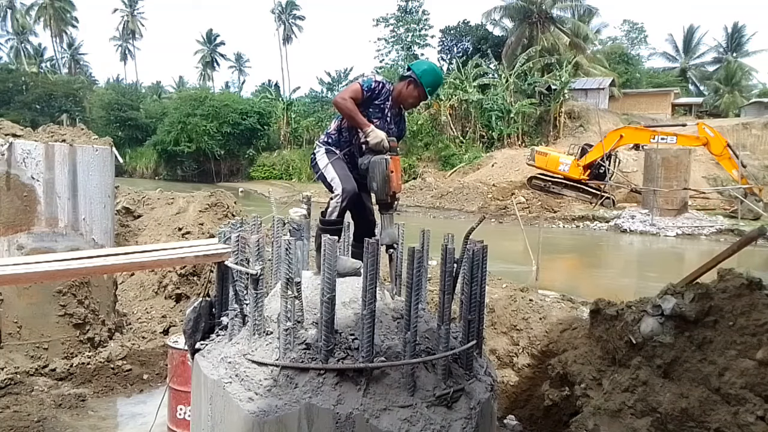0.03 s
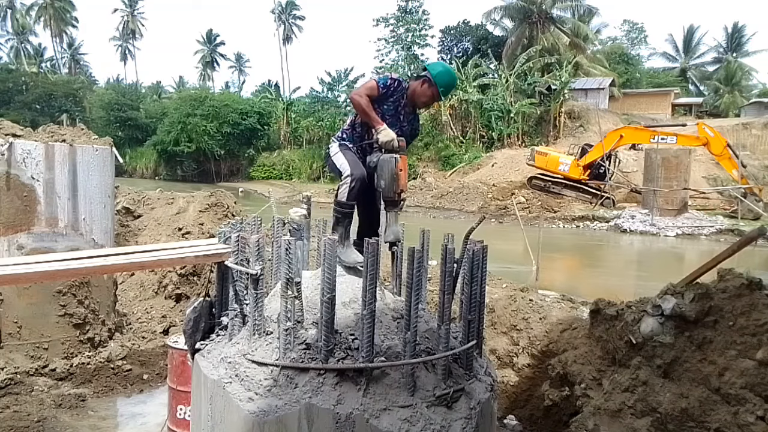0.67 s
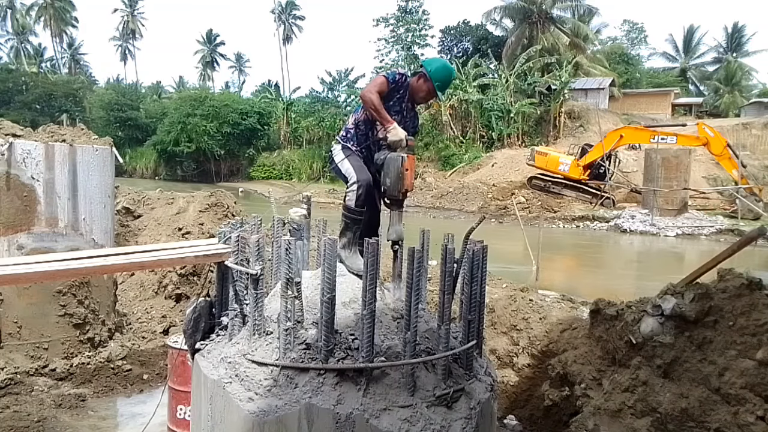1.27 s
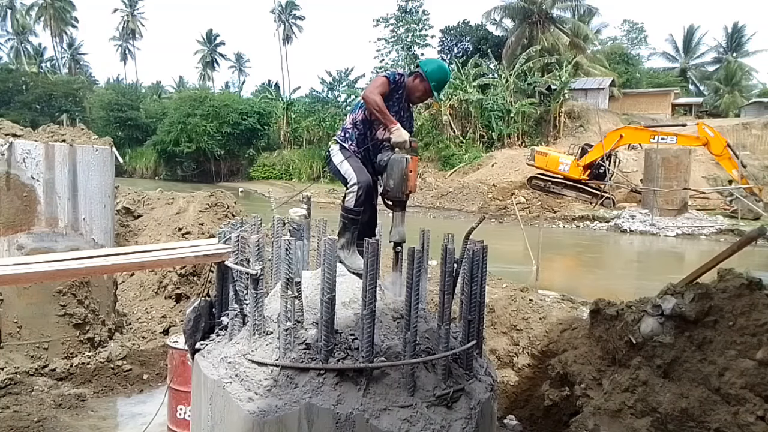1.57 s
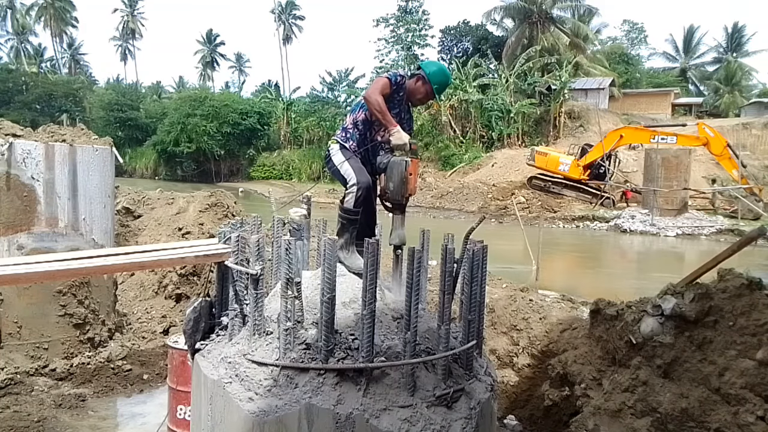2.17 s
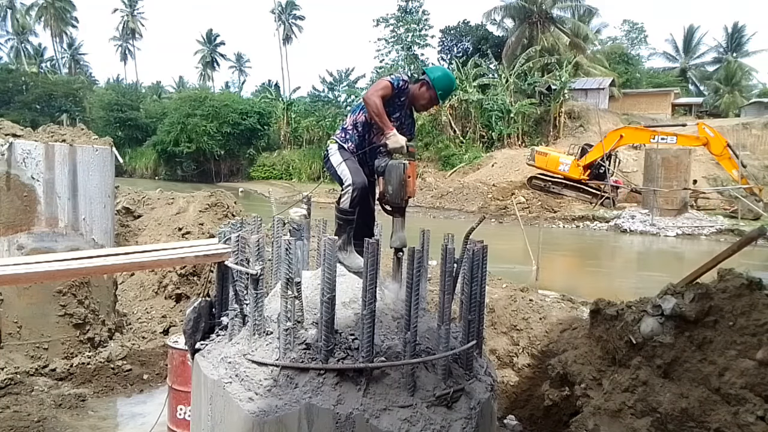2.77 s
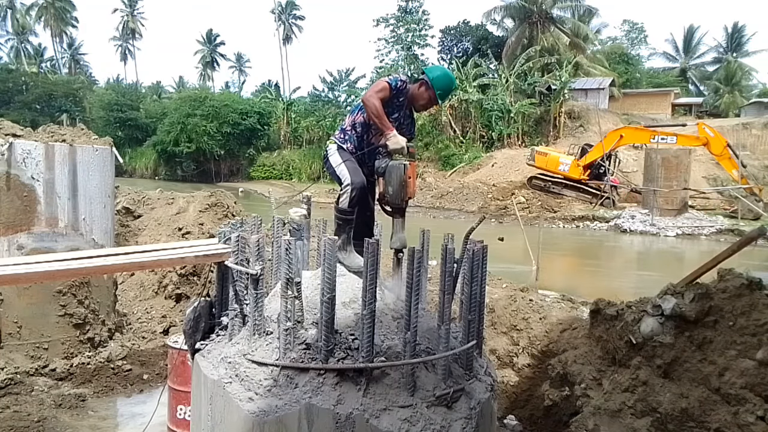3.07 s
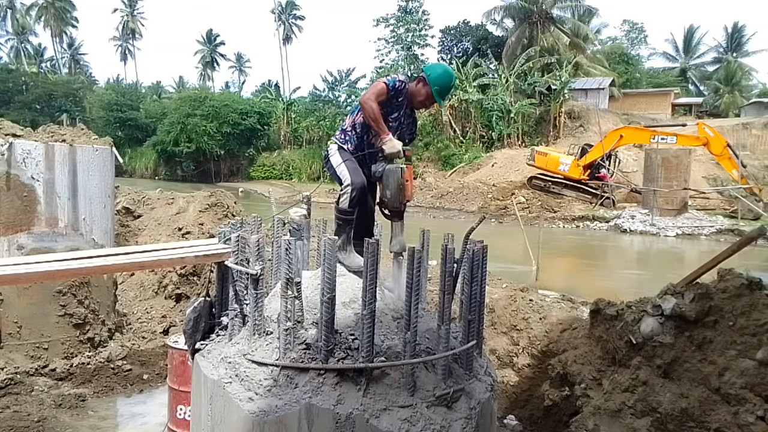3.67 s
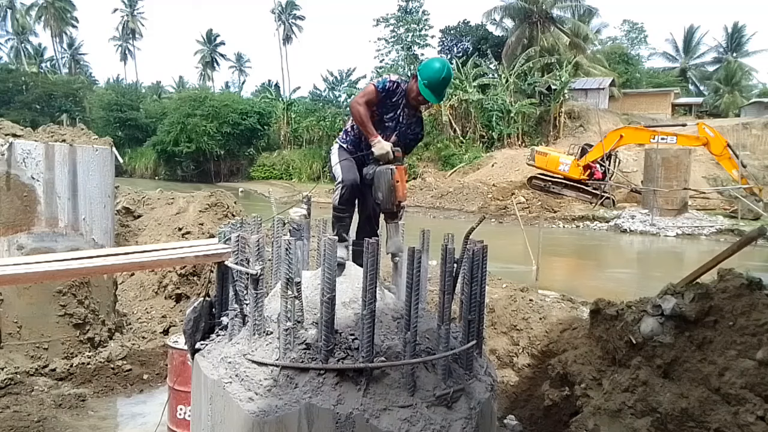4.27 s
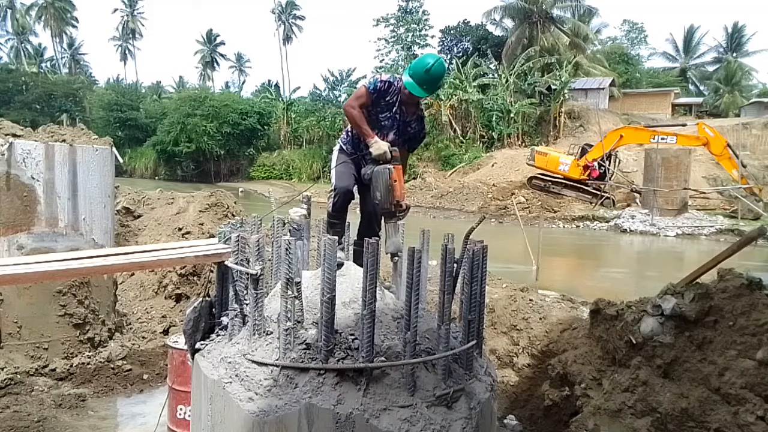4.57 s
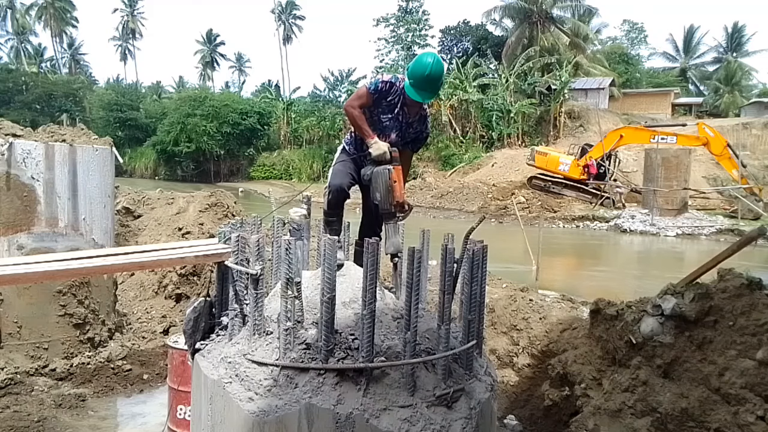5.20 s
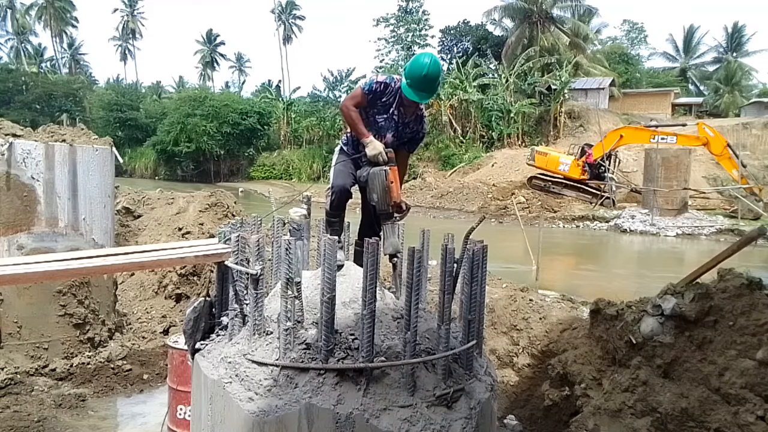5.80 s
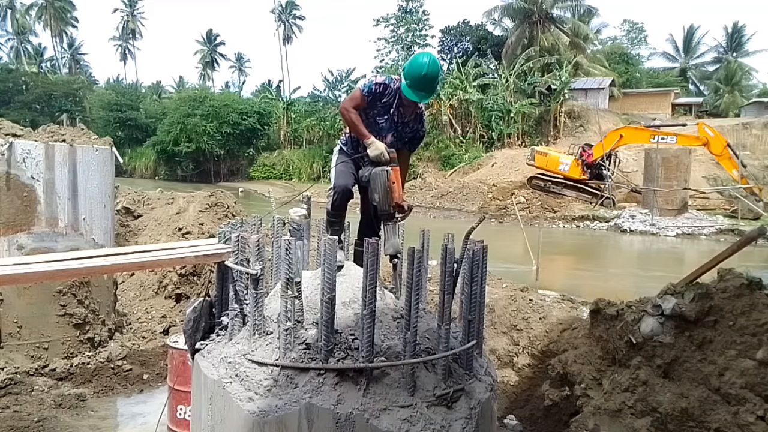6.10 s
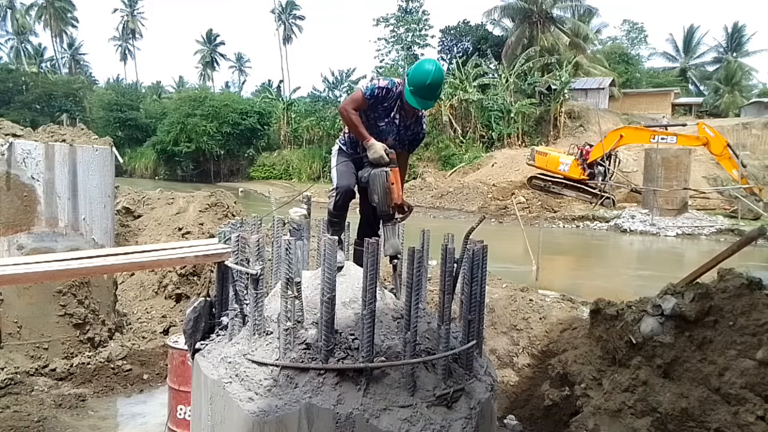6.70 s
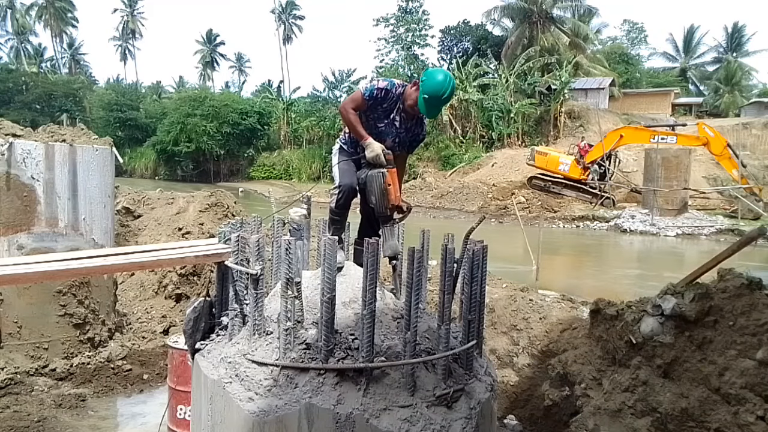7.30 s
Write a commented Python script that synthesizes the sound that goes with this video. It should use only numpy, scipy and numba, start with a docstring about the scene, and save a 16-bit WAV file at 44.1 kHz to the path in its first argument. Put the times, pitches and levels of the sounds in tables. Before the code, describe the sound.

An excavator rumbles, then a loud air hammer starts rattling against concrete, its chisel ringing, and slows near the end.

```python
"""A handheld air hammer breaks the concrete head of a pile on a building site.
First a diesel excavator rumbles nearby, its pump moaning; the chisel clinks down and rubble crunches.
Just after 1 s air rushes in, then up to some twenty blows a second follow: each a puff of exhaust,
a crack, flying grit and the ring of the steel chisel. The blows overload the microphone, and its gain
control pushes the engine far down. Later the chisel binds, its ring muffled; near 7 s the piston slows."""
import sys
import numpy as np
from scipy import signal
from scipy.fft import rfft, irfft
from scipy.io import wavfile
from scipy.ndimage import uniform_filter1d, minimum_filter1d
from numba import njit

SR = 44100
rng = np.random.default_rng(int(sys.argv[2]) if len(sys.argv) > 2 else 0)


def unload_wav(signal):
    """Save mono or channel-first audio to the path in sys.argv[1] as 16-bit WAV at rate SR, clipped to [-1, 1]."""
    wavfile.write(
        sys.argv[1],
        SR,
        np.round(np.clip(np.atleast_2d(signal).T, -1, 1) * 32767).astype(np.int16),
    )


N = 328545
T = np.arange(N) / SR


def undb(db):
    """Decibels to gain."""
    return 10 ** (np.asarray(db) / 20)


def unit(x):
    """Scale to rms 1."""
    return x / np.sqrt(np.mean(x ** 2))


def curve(rows, t, column=1):
    """Automation: one column of a table, joined by straight lines in time."""
    rows = np.array(rows)
    return np.interp(t, rows[:, 0], rows[:, column])


def add(out, start_s, x):
    """Mix x into out from start_s on."""
    i = max(int(start_s * SR), 0)
    out[i:i + len(x)] += x[:max(N - i, 0)]


def drift(rate_hz):
    """Smooth random modulation: sample and hold, slewed twice; rms 1."""
    hold = int(SR / rate_hz)
    steps = np.repeat(rng.standard_normal(N // hold + 1), hold)
    return unit(uniform_filter1d(uniform_filter1d(steps, hold), hold)[:N])


def equalise(x, points, resonances=()):
    """EQ curve plus resonant peaks, at power gain 1; minimum phase keeps the attacks sharp."""
    size = 4096
    f = np.arange(size // 2 + 1) * SR / size
    hz, db = np.transpose(points)
    peaks_db = sum(lift / (1 + (2 * (f - centre) / width) ** 2) for centre, width, lift in resonances)
    shape_db = np.interp(np.log(f + 1), np.log(hz), db) + peaks_db
    cepstrum = irfft(np.log(undb(shape_db)))
    cepstrum[1:size // 2] *= 2
    cepstrum[size // 2 + 1:] = 0
    response = irfft(np.exp(rfft(cepstrum)))
    return signal.fftconvolve(x, response / np.linalg.norm(response))[:N]


def noise_band(hz, width_hz):
    """Noise in one steep-sided resonance, rms 1."""
    f = np.arange(N // 2 + 1) * SR / N
    return unit(irfft(rfft(rng.standard_normal(N)) / (1 + (2 * (f - hz) / width_hz) ** 2), N))


def grit(per_second, spread_db):
    """Random ticks of very unequal size, rms 1."""
    ticks = (rng.random(N) < per_second / SR) * rng.standard_normal(N)
    return unit(ticks * undb(spread_db * np.minimum(rng.exponential(size=N), 4)))


def ring(t, hz, db, scatter_db, detune):
    """Modes struck at a slightly new place each time, so their balance and pitches vary; rms 1."""
    size, phase, shift = rng.standard_normal((3, len(hz)))
    gains = undb(db + scatter_db * size)
    modes = np.sin(2 * np.pi * (np.outer(hz * (1 + detune * shift), t) + phase[:, None]))
    return np.sqrt(2) * gains / np.linalg.norm(gains) @ modes


# drone of the engine and pump, firing tone first: (frequency [Hz], relative level [dB])
ENGINE_TONES = [(67.4, -32.5), (134.8, -33.5), (190.7, -42), (252.6, -33), (269.7, -31.5), (337.1, -44),
                (370.7, -38), (446.4, -42), (555.7, -46), (745.8, -51), (835.5, -52), (1074.4, -50)]
# EQ of the combustion rumble: (frequency [Hz], relative level [dB])
RUMBLE_EQ = [(25, -25), (45, -6), (65, -4.5), (140, 3), (200, -2), (290, 2.5), (340, -8.5), (460, -4),
             (590, -2.5), (700, -13), (860, -7.5), (1030, -23), (1230, -17.5), (1500, -39), (5000, -48),
             (13000, -69)]
# the excavator swells as it works: (time [s], engine gain [dB], hydraulic hiss level [dB])
ENGINE_LOAD = [(0, 1.5, -54), (.25, -2, -66), (.5, -1, -61.5), (.7, 1, -78), (1.2, -0.5, -70),
               (1.6, -7, -70), (7.15, -5.5, -75), (7.45, 0.5, -62)]
def excavator(rumble_db=-24.5, throb=0.2, waver=0.0014, flicker_db=1.5, whine_db=-67):
    """The bed: tones on one wavering shaft, rumble throbbing with the firings, hydraulic hiss and whine."""
    shaft_time = np.cumsum(1 + waver * drift(6)) / SR
    drone = np.zeros(N)
    for hz, db in ENGINE_TONES:
        level = np.sqrt(2) * undb(db + flicker_db * drift(7))
        drone += level * np.sin(2 * np.pi * (hz * shaft_time + rng.random()))
    firing = 1 + throb * np.sin(2 * np.pi * ENGINE_TONES[0][0] * shaft_time)
    rumble = undb(rumble_db) * equalise(firing * rng.standard_normal(N), RUMBLE_EQ)
    hiss = undb(curve(ENGINE_LOAD, T, column=2)) * noise_band(8330, 1200)
    whine = undb(whine_db) * noise_band(8960, 180)
    return (drone + rumble) * undb(curve(ENGINE_LOAD, T)) + hiss + whine


# glide of the pump's moan: (time [s], pitch [Hz], relative level [dB])
PUMP_MOAN = [(0, 1310, -37.5), (.1, 1263, -49), (.17, 1207, -50), (.3, 1215, -61), (.45, 1220, -68),
             (.55, 1200, -57), (.65, 1215, -63), (.75, 1260, -48), (.95, 1210, -61), (1.2, 1223, -53)]
def pump(roughness=1.0):
    """The hydraulic pump takes up load with a rough, gliding tone."""
    phase = 2 * np.pi * np.cumsum(curve(PUMP_MOAN, T)) / SR
    tone = np.sin(phase) + roughness * drift(90) * np.cos(phase)
    return np.sqrt(2) * undb(curve(PUMP_MOAN, T, column=2)) * tone


# crunches underfoot and at the tip: (time [s], level [dB], half-width [s])
CRUNCHES = [(0.418, -57, .004), (.71, -52, .012), (0.752, -46.5, 0.046), (1.04, -45, 0.005),
            (2.9, -22, .012), (4.189, -18.5, 0.025)]
# EQ of the rubble: (frequency [Hz], relative level [dB])
RUBBLE_EQ = [(500, -7), (1800, 8), (3000, -2.5), (6000, -18), (7700, -7), (11000, -29)]
def rubble(crumbs_db=-68):
    """Rubble crunches under the boots and the chisel, and loose crumbs tick."""
    envelope = sum(undb(db) * np.exp(-((T - s) / width) ** 2) for s, db, width in CRUNCHES)
    return equalise(envelope * grit(4000, 3) + undb(crumbs_db) * grit(60, 1.5), RUBBLE_EQ)


# one touch and two bounces: (time [s], level [dB])
SET_DOWN = [(.281, -37.5), (.288, -48), (.295, -56)]
# bright, steely EQ of the clink: (frequency [Hz], relative level [dB])
CLINK_EQ = [(1500, -2), (3500, -6), (4100, 0), (4800, -9), (7000, -12), (9000, 7), (10500, -14),
            (15000, -18)]
def clinks(fall_s=0.0069, ring_s=0.086, ring_db=-16):
    """The chisel is set down, steel on steel: quick ticks with a faint tail."""
    t, envelope = T[:SR // 3], np.zeros(N)
    for s, db in SET_DOWN:
        add(envelope, s, undb(db) * (np.exp(-t / fall_s) + undb(ring_db) * np.exp(-t / ring_s)))
    return equalise(envelope * rng.standard_normal(N), CLINK_EQ)


# the tool touches a reinforcing bar: (time [s], pitch [Hz], level [dB], decay [s])
BAR_TOUCHES = [(.283, 4130, -55, .04), (4.186, 2540, -30, 0.018), (4.19, 3180, -30, .012),
               (4.228, 3070, -27, .016), (4.231, 4100, -22, 0.018), (7.313, 2860, -21, 0.011)]
def bar_chinks():
    """A touched bar rings briefly in a close pair of modes."""
    t, out = T[:SR // 4], np.zeros(N)
    for s, hz, db, fall_s in BAR_TOUCHES:
        pair = ring(t, np.array([hz, hz]), 0, scatter_db=-5, detune=0.014)
        add(out, s, undb(db) * np.exp(-t / fall_s) * pair)
    return out


# tempo of the piston, set by the trigger: (time [s], pace [strokes/s])
PISTON_PACE = [(1.27, 12.38), (1.38, 17.81), (1.65, 20.94), (1.69, 24.99), (1.87, 17.7), (1.92, 28.56),
               (2.08, 18.34), (2.16, 6.07), (2.22, 18.93), (2.47, 10.02), (2.57, 12.31), (2.65, 18.55),
               (2.92, 20.3), (4.09, 20.68), (4.14, 17.91), (4.18, 20.73), (4.73, 20.78), (4.92, 17.84),
               (4.99, 14.24), (5.16, 15.54), (5.32, 20.53), (5.81, 21.66), (6.0, 19.72), (6.05, 16.53),
               (6.25, 12.81), (6.34, 17.7), (6.54, 21.47), (6.74, 14.95), (7.02, 8.7), (7.3, 4.57)]
def pace_octaves(t, full_pace_hz=20.5):
    """The piston's pace in doublings from full pace."""
    return np.log2(curve(PISTON_PACE, t) / full_pace_hz)


# the chisel bites as the worker leans on the tool: (time [s], relative crack level [dB])
BITE = [(1.27, -8), (1.34, -15.5), (1.58, -10.5), (1.68, -15.5), (1.92, -17), (2.0, -14), (2.12, -15),
        (2.55, -13.5), (2.78, -10.5), (3.1, -10), (3.19, -17.5), (3.47, -16), (3.8, -12.5), (4.15, -11),
        (4.3, -14), (4.65, -9.5), (5.05, -13.5), (5.8, -11), (6.12, -13.5), (6.47, -9.5), (6.6, -12.5),
        (6.9, -14.5), (7.29, -27)]
# the exhaust grows as the tool is turned: (time [s], puff gain on top of the bite [dB])
PUFF_GAIN = [(1.3, -12), (1.75, -5.5), (2.0, -5.5), (3.2, -9.5), (4.1, -7), (4.45, -6.5), (4.62, -18),
             (4.85, -1.5), (5.3, -5.5), (5.5, -8.5), (5.92, -4), (6.1, -13), (6.45, -7), (7.3, -15)]
# the chisel rings shorter and purer as it sinks into the concrete:
# (time [s], relative ring level [dB], ring length [s], overtone damping [dB])
CHISEL_SEAT = [(1.28, -16, 0.032, -9), (1.45, -20, 0.09, -3), (1.55, -15.5, 0.042, 0),
               (1.9, -18.5, 0.055, 0), (2.25, -16, 0.036, 3), (2.5, -17, 0.022, -3), (2.72, -12, 0.04, 5),
               (3.08, -13.5, 0.028, 0), (3.22, -19.5, 0.042, 5), (3.85, -12, 0.03, 8.5),
               (4.22, -12.5, 0.036, 3), (4.45, -10.5, 0.015, 9), (5.6, -10.5, .014, 6.5),
               (6.55, -20.5, 0.026, 4), (6.85, -11, 0.0095, 5), (7.2, -13, 0.012, 1)]
# the chisel binds and its ring is muffled: (start [s], end [s], ring gain [dB])
CHISEL_JAMS = [(2.03, 2.08, -8), (2.36, 2.42, -6.5), (3.75, 3.8, -2), (4.09, 4.14, -9), (4.29, 4.34, -19),
               (4.53, 4.603, -17), (4.58, 4.675, -7), (4.675, 4.753, -32), (4.88, 5.41, -20),
               (5.45, 5.5, -10), (5.69, 5.73, -4), (5.73, 6.505, -26), (7.06, 7.37, -23)]
# accents that land solidly and thump the whole pile: (time [s], relative thump level [dB])
SOLID_HITS = [(1.56, -7), (1.6, -4), (1.785, -8.5), (1.96, -10), (2.005, -6), (2.205, -9), (2.745, -7.5),
              (2.795, -7), (3.04, -6), (3.14, -9), (3.34, -15), (3.775, -13), (3.92, -13), (4.115, -4),
              (4.46, -12), (4.51, -7), (5.375, -10.5), (5.755, -15), (5.9, -10), (5.995, -9), (6.05, -11),
              (6.58, -10)]
def piston_blows(thump_db=-21, solid_db=0.5, puff_db_per_octave=7, crack_scatter_db=1.24,
                 thump_scatter_db=3, puff_scatter_db=3.2, ring_scatter_db=1.8, length_scatter=0.26):
    """One blow a stroke: (time [s], crack [dB], thump [dB], puff [dB], ring [dB], ring length [s])."""
    strokes = np.cumsum(curve(PISTON_PACE, T) * (T >= PISTON_PACE[0][0])) / SR
    times = T[np.searchsorted(strokes, np.arange(strokes[-1]), side="right")]
    chance = rng.standard_normal((len(times), 5)).T
    bite = curve(BITE, times)
    crack = bite + crack_scatter_db * chance[0]
    thump = thump_db + thump_scatter_db * chance[1]
    for s, db in SOLID_HITS:
        nearest = np.argmin(np.abs(times - s))
        thump[nearest] = db
        crack[nearest] += solid_db
    pace_db = puff_db_per_octave * pace_octaves(times)  # more strokes let out more air
    puff = bite + curve(PUFF_GAIN, times) + pace_db + puff_scatter_db * chance[2]
    muffling = sum(db * ((times > start) & (times < end)) for start, end, db in CHISEL_JAMS)
    ringing = curve(CHISEL_SEAT, times) + muffling + ring_scatter_db * chance[3]
    length = curve(CHISEL_SEAT, times, column=2) * np.exp(length_scatter * chance[4])
    return list(zip(times, crack, thump, puff, ringing, length))


# air rushes in ahead of the first stroke: (time [s], relative level [dB])
VALVE_OPENING = [(1.1, -100), (1.15, -60), (1.175, -33.5), (1.205, -37), (1.225, -28.5), (1.27, -25)]
def air_leak(chatter_hz=115, chatter_db=4, unevenness=.25, leak_db=-18.5, bite_share=0.59,
             db_per_octave=1.5):
    """Air envelope: the valve chatters as it opens; once the piston runs, the leak follows bite and pace."""
    flap = np.cos(2 * np.pi * np.cumsum(chatter_hz * (1 + unevenness * drift(100))) / SR)
    opening = curve(VALVE_OPENING, T) + chatter_db * flap
    running = leak_db + bite_share * curve(BITE, T) + db_per_octave * pace_octaves(T)
    return undb(np.where(T < PISTON_PACE[0][0], opening, running))


# resonances of the casing and the pile, in puffs and cracks: (frequency [Hz], width [Hz], lift [dB])
BODY_PEAKS = [(471.6, 106, 5.5), (1206, 55, 2.5), (1730, 110, 4.5), (4850, 79, -1), (5700, 550, 3.5),
              (7540, 1100, 6)]
# EQ of the exhaust air: (frequency [Hz], relative level [dB])
PUFF_EQ = [(200, -12), (470, -1), (750, 0), (1020, -1.5), (1300, 1), (1900, 0), (2800, -1), (3900, -7),
           (5300, -8), (6400, -15.5), (8200, -15.5), (10500, -23.5), (14000, -31)]
# buzz of the exhaust port, riding on the air flow: (time [s], relative level [dB])
PORT_RASP = [(1.15, 5.5), (1.26, 5), (1.35, -1), (3.5, -19), (4.4, -4), (5.2, 3), (6.0, -1.5), (6.8, -6),
             (7.3, 6)]
def exhaust(blows, lead_s=0.0064, width_s=0.0052, puff_db=2.0, scatter_s=0.00063, flutter_db=3.0):
    """The piston uncovers the port just before it strikes; air leaks and flutters, and the port rasps."""
    t, puffs = T[:SR // 15], np.zeros(N)
    middle = t.mean()
    swell = 1 / (1 + ((t - middle) / width_s) ** 2)
    for (s, _, _, db, *_), early in zip(blows, rng.standard_normal(len(blows))):
        add(puffs, s - lead_s - scatter_s * early - middle, undb(db + puff_db) * swell)
    flow = np.hypot(puffs, air_leak()) * undb(flutter_db * np.tanh(drift(300)) + 0.5)
    port = noise_band(2000, 550) + undb(-8) * noise_band(2660, 600)
    rasp = flow * undb(curve(PORT_RASP, T) - 5.0) * port
    return equalise(flow * grit(14000, 2.4), PUFF_EQ, BODY_PEAKS) + rasp


def thumps(blows, length_s=0.0035, rise_s=0.00078, thump_db=4):
    """The low punch: a blow's pressure wave drives the microphone one way for a few milliseconds."""
    t, out = T[:SR // 30], np.zeros(N)
    pulse = (1 - np.exp(-t / rise_s)) * np.exp(-(t / length_s) ** 4)
    for s, _, db, *_ in blows:
        add(out, s, -undb(db + thump_db) * pulse)
    return out


# the loose tool knocks or bounces: (time [s], relative crack level [dB], relative ring level [dB])
LOOSE_KNOCKS = [(1.779, -14, -25), (2.273, -19.5, -12), (4.234, -18, -9), (5.087, -45, -45),
                (6.244, -41, -37), (6.807, -23, -44), (6.921, -23, -37), (7.021, -23.5, -22),
                (7.046, -25.5, -33), (7.143, -22, -27), (7.313, -28, -42)]
# modes of the casing and the reinforcing bars: (frequency [Hz], relative level [dB])
CLANK_MODES = [(1230, -1), (1420, 2), (1620, -1), (1880, 1), (2190, -5), (2580, -4), (2900, -0.5),
               (3450, -5), (4790, -4.5), (5700, -5)]
def clanks(blows, clank_db=-10, fall_s=0.025):
    """Every blow or knock shakes the casing and the bars into a short clank."""
    hz, mode_db = np.transpose(CLANK_MODES)
    t, out = T[:SR // 10], np.zeros(N)
    for s, db, *_ in blows + LOOSE_KNOCKS:
        metal = ring(t, hz, mode_db, scatter_db=7.5, detune=0.0241)
        add(out, s, undb(db + clank_db) * np.exp(-t / fall_s) * metal)
    return out


def shards(blows, low_hz=1107, high_hz=3287, shard_db=-1, rise_s=0.0014, fall_s=0.0054, modes=4):
    """Every blow splits off a new piece of concrete, which rings very briefly at pitches of its own."""
    t, out = T[:SR // 20], np.zeros(N)
    envelope = (1 - np.exp(-t / rise_s)) * np.exp(-t / fall_s)
    for s, db, *_ in blows:
        hz = low_hz * (high_hz / low_hz) ** rng.random(modes)
        add(out, s, undb(db + shard_db) * envelope * ring(t, hz, 0, scatter_db=3.5, detune=0))
    return out


# bright modes of the steel: (frequency [Hz], relative level [dB], share of the seat's damping [0-1])
CHISEL_MODES = [(6963, -5.5, .1), (7046, 0, 0), (7434, -6, 1), (7628, -12, .9), (5450, -22, .7),
                (9888, -23, .8), (10170, -27, .4), (12364, -25, .3), (13166, -26, .5), (13342, -25, .5),
                (13619, -29, .6), (14577, -20, .5)]
def chisel(blows, ring_db=1.0, rise_s=0.0031, bounce_s=0.013, chatter=0.075, choke_db=-7, wobble_db=2):
    """The steel rings while it rebounds; it is choked as it seats again and when the piston next lands."""
    hz, mode_db, grip = np.transpose(CHISEL_MODES)
    bounces = [(s, db, bounce_s) for s, _, db in LOOSE_KNOCKS]
    strikes = sorted([(s, db, length) for s, *_, db, length in blows] + bounces)
    ends = [s for s, _, _ in strikes[1:]] + [T[-1]]
    t, out = T[:SR // 9], np.zeros(N)
    for (s, db, length), end in zip(strikes, ends):
        envelope = (1 - np.exp(-t / rise_s)) * np.exp(-(t / length) ** 2)
        choke = undb(choke_db * np.clip((s + t - end) / rise_s, 0, 1))
        damped_db = mode_db - grip * curve(CHISEL_SEAT, s, column=3)
        steel = ring(t, hz, damped_db, scatter_db=3.5, detune=0.0018)
        add(out, s, undb(db + ring_db) * envelope * choke * steel)
    # the tip chatters against the concrete and roughens the ring
    return out * (1 + chatter * drift(900)) * undb(wobble_db * (drift(130) - .5))


# the shank rattles with each crack: (time [s], high zing gain [dB], lower ping gain [dB])
SHANK_RATTLE = [(1.3, -23, -14), (4.25, -23.5, -24), (4.33, -12.5, -6), (4.9, -13, -8), (5.5, -17, -3.5),
                (5.8, -16.5, -8), (6.3, -18, -6), (7.3, -17.5, -20)]
# EQ of splitting concrete: (frequency [Hz], relative level [dB])
CRACK_EQ = [(120, -4), (470, 1), (750, 0), (1020, -0.5), (1300, 2.5), (1850, -0.5), (2800, -1.5),
            (3900, -7), (4900, -5), (6300, -9), (8200, -11.5), (9300, -16), (11000, -19), (14000, -22)]
def cracks(blows, crack_db=2, hold_s=0.004, fall_s=0.0043, tail_db=-12, tail_s=0.028,
           chips_db=-15, chips_s=0.026, ping_s=0.0081):
    """Concrete splits: a hard burst, a tail off the ground, flying chips; the shank pings in its holder."""
    t = T[:SR // 6]
    burst, tail, chips, ping = np.zeros((4, N))
    for s, db, *_ in blows + LOOSE_KNOCKS:
        add(burst, s, undb(db) * np.exp(-np.maximum(t - hold_s, 0) / fall_s))
        add(tail, s, undb(db) * np.exp(-t / tail_s))
        add(chips, s, undb(db) * np.exp(-t / chips_s))
        add(ping, s, undb(db) * np.exp(-t / ping_s))
    concrete = undb(crack_db) * burst * grit(20000, 1.94)
    concrete += undb(tail_db) * tail * rng.standard_normal(N)
    concrete += undb(chips_db) * chips * grit(1500, 6.9)
    zing = undb(curve(SHANK_RATTLE, T) + 3.0 * drift(35)) * tail * noise_band(12290, 640)
    ping_tone = noise_band(4765, 180) + undb(-14) * noise_band(5730, 260)
    shank = zing + undb(curve(SHANK_RATTLE, T, column=2)) * ping * ping_tone
    return equalise(concrete, CRACK_EQ, BODY_PEAKS) + shank


def scene():
    """The mono mix: the hammer up front, the excavator behind it."""
    blows = piston_blows()
    impacts = cracks(blows) + shards(blows) + thumps(blows)
    tool = exhaust(blows) + chisel(blows) + clanks(blows)
    handling = clinks() + bar_chinks() + rubble()
    return (impacts + tool + handling + excavator() + pump())[None]


@njit
def follow_peaks(x, attack, release):
    """Envelope follower with separate rates for rising and falling."""
    out, level = np.empty(len(x)), 0.
    for i in range(len(x)):
        level += (x[i] - level) * (attack if x[i] > level else release)
        out[i] = level
    return out


def record(dry, boost_db=12.5, quiet=0.35, loud=0.51, attack_s=.012, hold_s=.42, release_s=.16,
           ceiling=.72, top_hz=15450):
    """Gain control lifts quiet sound and ducks under the blows; peaks soft-clip; the top end is cut."""
    window = int(hold_s * SR) | 1  # odd length
    held = -minimum_filter1d(-np.abs(dry[0]), window, origin=window // 2, mode="constant")
    peak = follow_peaks(held, 1 / (attack_s * SR), 1 / (release_s * SR))
    driven = dry * undb(np.interp(peak, [quiet, loud], [boost_db, 0]))
    clipped = driven / (1 + (driven / ceiling) ** 6) ** (1 / 6)
    lowpass = signal.ellip(8, .1, 60, top_hz, fs=SR, output="sos")
    return signal.sosfiltfilt(lowpass, clipped)


dry = scene()
out = record(dry)
unload_wav(out)
```